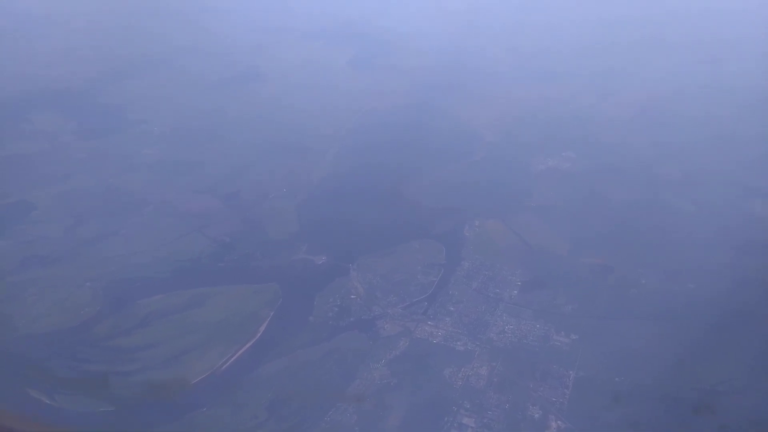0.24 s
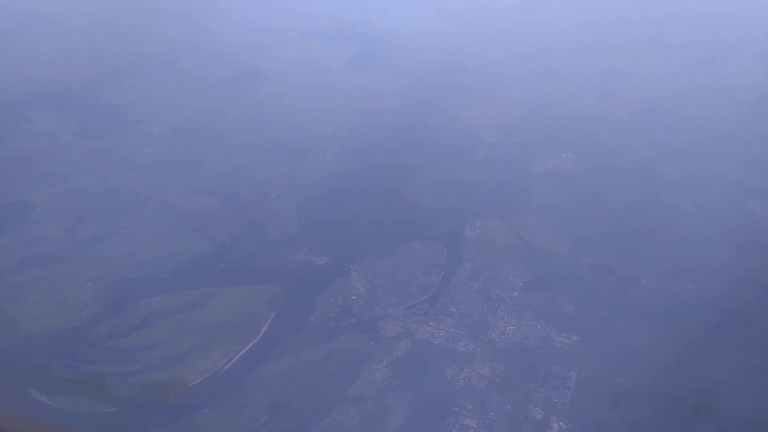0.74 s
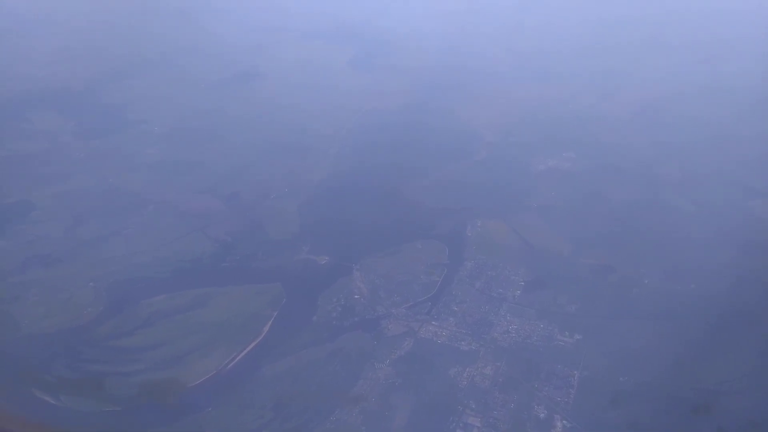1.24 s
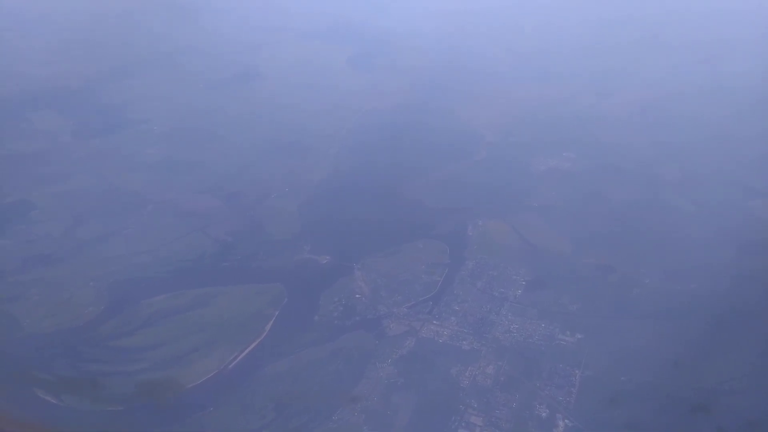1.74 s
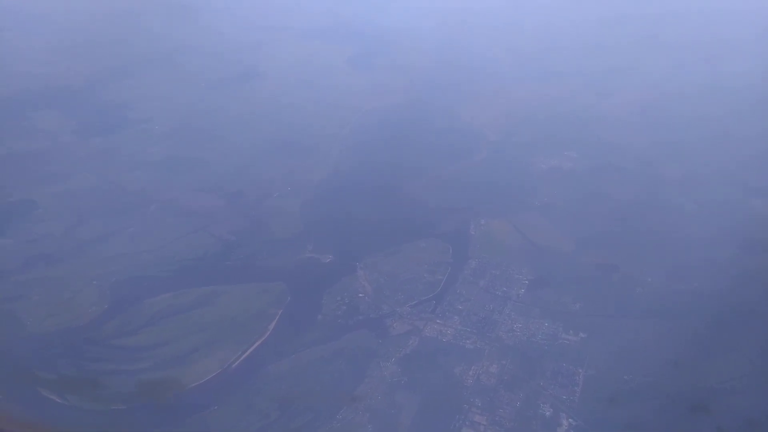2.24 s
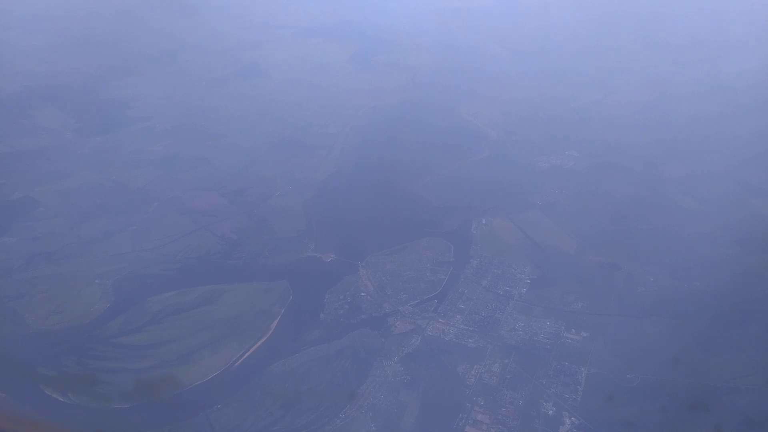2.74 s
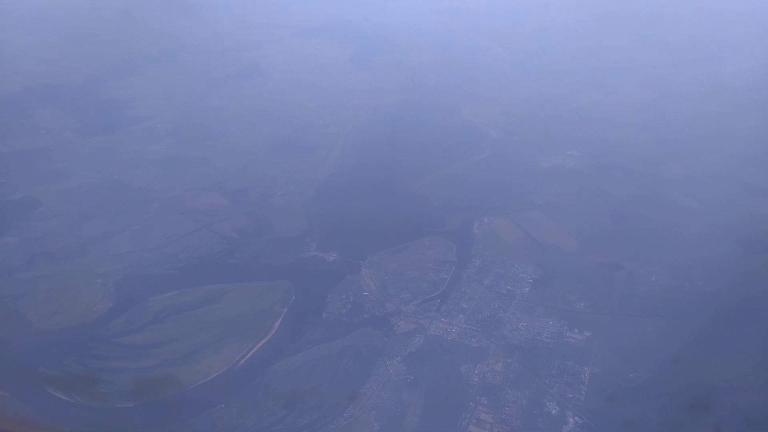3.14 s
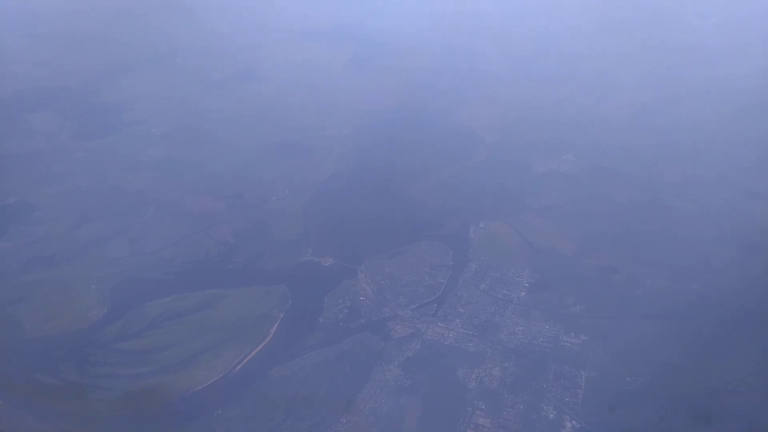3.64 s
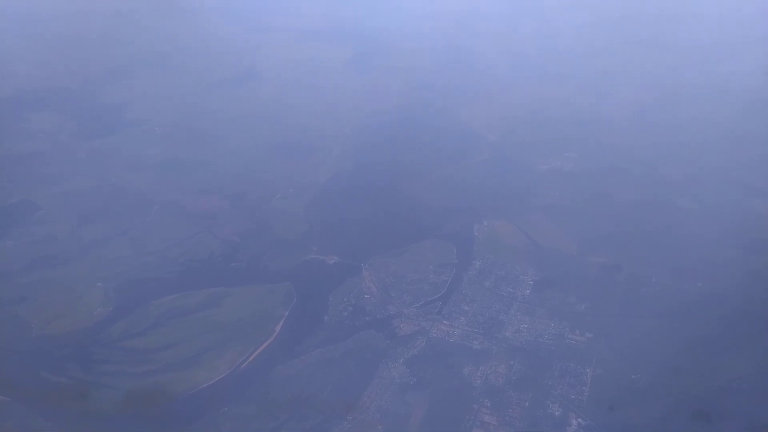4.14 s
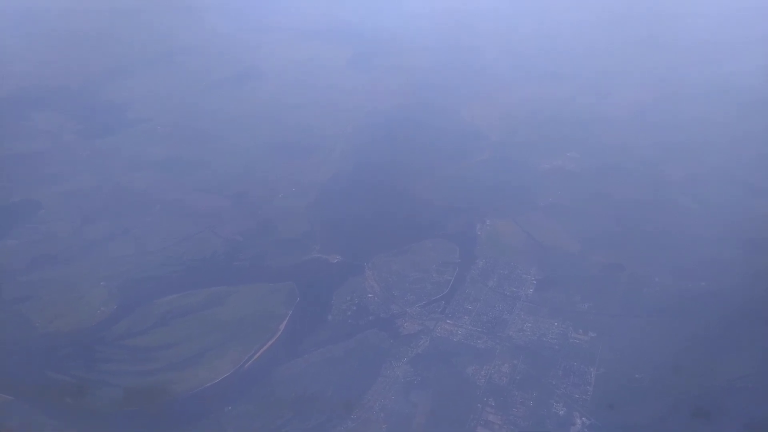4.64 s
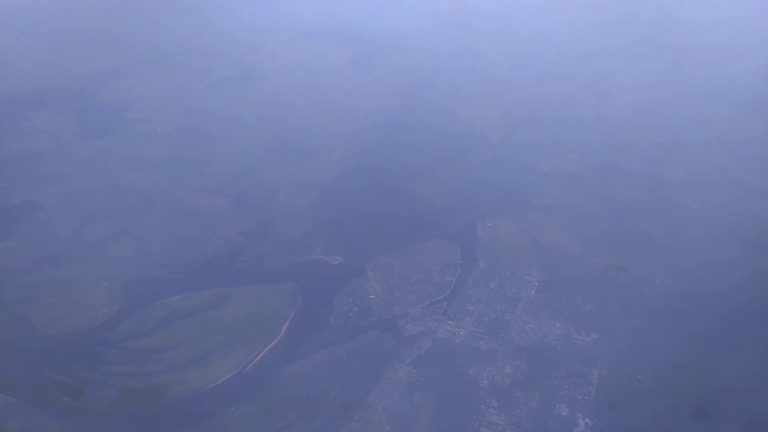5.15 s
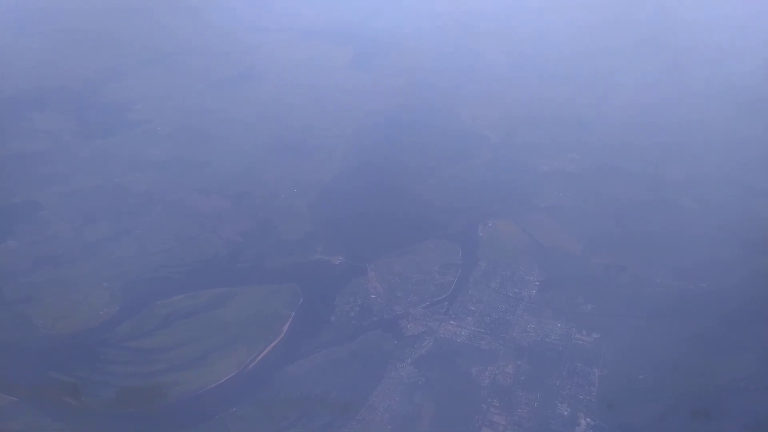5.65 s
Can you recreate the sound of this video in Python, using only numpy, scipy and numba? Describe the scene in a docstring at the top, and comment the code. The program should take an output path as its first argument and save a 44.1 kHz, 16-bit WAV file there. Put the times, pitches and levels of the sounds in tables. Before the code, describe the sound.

Close to the window in a cruising airliner, engine and airflow noise shake the fuselage. A low boom swells and drops out unevenly, with a lumpy mid-range roar from the wall panels and a thin whistling hiss at the window. A loose plastic part ticks and buzzes irregularly throughout, busiest around three and a half seconds, then sparser. Mono microphone, slight hiss of its own.

```python
"""Inside an airliner in cruise, close to the window. Engine exhaust and the air rushing past shake the fuselage:
noise through low resonances makes a boom that swells and drops out, higher ones a roar in the wall panels
and a hiss in the window cavity. A loose plastic part buzzes and ticks: tiny contacts and sharp blows
ring its modes. Faint treble puffs, made of gliding bands of noise, stand over the hiss of the microphone."""
import sys
import numpy as np
from scipy import signal
from scipy.fft import rfft, irfft, next_fast_len
from scipy.io import wavfile
from scipy.ndimage import uniform_filter1d
from numba import njit

SR = 44100
rng = np.random.default_rng(int(sys.argv[2]) if len(sys.argv) > 2 else 0)


def file_out(sig):
    """Save sig as 16-bit WAV at sys.argv[1]."""
    # one column per channel
    cols = np.atleast_2d(sig).T
    # limit, then scale
    lim = np.clip(cols, -1, 1)
    pcm = np.round(lim * 32767).astype(np.int16)
    wavfile.write(sys.argv[1], SR, pcm)


N = 260631  # length in samples


def undb(db):
    """Turn decibels into a plain gain."""
    return 10 ** (np.asarray(db) / 20)


def unit(x):
    """Scale a sound to an RMS (average strength) of 1."""
    return x / np.sqrt(np.mean(x ** 2))


def columns(table):
    """Draw straight lines through each column of a table, one value a sample."""
    time_s, *curves = np.transpose(table)
    return [np.interp(np.arange(N) / SR, time_s, curve) for curve in curves]


@njit
def svf(x, hz, width):
    """State-variable band-pass, gain 1 at a centre that may move every sample."""
    y, band, low = np.empty(len(x)), 0., 0.
    for i in range(len(x)):
        g, damping = np.tan(np.pi * hz[i] / SR), width / hz[i]
        v = (band + g * (x[i] - low)) / (1 + g * (g + damping))
        low += 2 * g * v
        band = 2 * v - band
        y[i] = damping * v
    return y


def ring(force, hz, width):
    """A resonance with steep skirts: three equal band-passes in a row."""
    centre = hz * np.ones(N)
    for _ in range(3):
        force = svf(force, centre, 2 * width)
    return force


def walk(rate):
    """Random levels held 1 / rate seconds and smoothed twice; spread near 1."""
    hold = max(int(SR / rate), 1)
    steps = np.repeat(rng.standard_normal(N // hold + 1), hold)
    return 0.91 * uniform_filter1d(uniform_filter1d(steps, hold), hold)[:N]


def flutter(rate):
    """A quick walk without slow drift, its highs capped at 1.3 while its lows go deeper."""
    w = walk(rate)
    return np.minimum(w - uniform_filter1d(w, int(.3 * SR)), 1.3)


def shaken(modes, flicker_db, rate, drift, gust_db=2.0, patch_db=0):
    """Turbulence drives each mode on its own; strength flickers, alone and together, and the centre wanders."""
    gust = gust_db * flutter(1.3 * rate)  # shared by all modes; a negative gust_db caps the dips instead
    total = np.zeros(N)
    for hz, width, db in modes:
        level_db = db + gust + flicker_db * flutter(rate) + patch_db * walk(2.6)
        centre = hz * (1 + drift * walk(2.947))
        total += undb(level_db) * ring(rng.standard_normal(N), centre, width)
    return unit(total)


# Low drumming of the fuselage: time_s, lower_boom_db, upper_boom_db
BOOM = [(0.03, -25, -26), (0.41, -30, -28), (0.47, -35, -43), (0.53, -36, -22.5), (0.73, -39.5, -27.5),
        (0.8, -25.5, -22), (0.83, -33.5, -26.5), (1.11, -16.5, -30.5), (1.12, -23.5, -22.5),
        (1.24, -30.5, -37), (1.38, -31, -24.5), (1.55, -40.5, -50.5), (1.63, -32, -26.5),
        (1.73, -32, -31.5), (1.97, -19.5, -22.5), (2.0, -22, -24), (2.13, -31.5, -38), (2.17, -23.5, -31),
        (2.33, -35.5, -29), (2.36, -41.5, -46), (2.43, -24.5, -27), (2.46, -32.5, -32),
        (2.66, -19.5, -30.5), (2.79, -40, -31), (2.9, -41.5, -56), (3.0, -35, -24.5), (3.07, -32, -45),
        (3.15, -19, -30), (3.18, -33, -24), (3.26, -29.5, -34), (3.39, -26.5, -30.5), (3.59, -29, -32),
        (3.64, -42, -44), (3.7, -40, -53), (3.78, -27, -32), (3.83, -30, -36), (3.96, -25.5, -25),
        (4.01, -30.5, -24.5), (4.09, -21.5, -34.5), (4.12, -42, -20.5), (4.21, -24.5, -41),
        (4.24, -35, -35.5), (4.31, -20, -24.5), (4.37, -36.5, -43.5), (4.5, -26.5, -20), (4.54, -38, -29),
        (4.57, -20, -25.5), (4.6, -39, -26.5), (4.63, -33, -32), (5.01, -34.5, -32), (5.09, -38.5, -44),
        (5.19, -34, -24), (5.32, -40, -33.5), (5.4, -39, -48), (5.43, -40.5, -26.5), (5.53, -28.5, -31.5),
        (5.58, -41.5, -25), (5.81, -30, -30), (5.86, -46.5, -58), (5.89, -51, -45)]
# Resonances of the shell, each: pitch_hz, width_hz, relative level_db
RUMBLE_MODES = [(36, 24, -17), (52, 39, -12), (78.7, 13, -2.5)]
LOWER_MODES = [(113.5, 44.4, -7.5), (148.8, 26.3, -3.5), (169.9, 46, -8.5)]
UPPER_MODES = [(224.3, 23.9, -1), (252, 17.3, 2), (285.4, 40, -15), (337, 55, -25.5)]
MEAN_BOOM_DB = -31
RUMBLE_DB, RUMBLE_FOLLOWS = -42, 0.2  # level when the lower boom is at its mean; dB per dB of that boom


def fuselage():
    """The shell drums in three groups of low modes; rumble swells with the lower boom, booms throb together."""
    lower_db, upper_db = columns(BOOM)
    rumble_db = RUMBLE_DB + RUMBLE_FOLLOWS * (lower_db - MEAN_BOOM_DB)
    throb_db = 2.2 * flutter(12)
    lower_boom = undb(lower_db + throb_db) * shaken(LOWER_MODES, 3.9, 14, 0.024, gust_db=-0.9)
    upper_boom = undb(upper_db + throb_db) * shaken(UPPER_MODES, 0.89, 9, 0.016, gust_db=-0.5)
    rumble = undb(rumble_db) * shaken(RUMBLE_MODES, 2.2, 15, 0.075)
    return lower_boom + upper_boom + rumble


# Roar of the panels: time_s, floor_db, lower_wall_db, upper_wall_db, overhead_db
PANELS = [(0.0, -44.5, -44, -42.5, -46), (0.13, -33, -42.5, -49.5, -61.5), (0.26, -46.5, -43.5, -44, -52),
          (0.39, -40.5, -45, -41, -67), (0.52, -43, -40.5, -47.5, -53.5), (0.66, -45, -47, -40.5, -48),
          (0.79, -53.5, -39, -55.5, -53), (0.92, -55, -43.5, -45.5, -49.5),
          (1.05, -40.5, -42.5, -48.5, -47.5), (1.18, -56, -46.5, -51.5, -57.5),
          (1.31, -52, -43.5, -42.5, -50), (1.44, -43.5, -40.5, -45.5, -45.5), (1.57, -38, -44, -49, -59),
          (1.7, -45, -39.5, -41, -55), (1.84, -55.5, -51.5, -48, -58.5), (1.97, -43, -46, -44.5, -65.5),
          (2.1, -41.5, -58.5, -43.5, -47.5), (2.23, -51.5, -39.5, -52, -65), (2.36, -52, -51.5, -49, -67),
          (2.49, -57, -32.5, -44.5, -52), (2.62, -72.5, -62.5, -51, -56.5), (2.75, -44.5, -46.5, -49, -60),
          (2.88, -54, -52, -44, -61.5), (3.02, -66, -45, -62, -63), (3.15, -40, -40, -48.5, -61),
          (3.28, -53.5, -45.5, -45.5, -62), (3.41, -37, -41, -43, -53), (3.54, -61, -50.5, -51.5, -63),
          (3.67, -41.5, -41, -45.5, -66), (3.8, -43, -44.5, -49.5, -56), (3.93, -51.5, -44.5, -52.5, -56),
          (4.06, -41, -42.5, -45, -58.5), (4.2, -57.5, -58.5, -45, -60), (4.33, -55.5, -51.5, -46.5, -79),
          (4.46, -48.5, -46.5, -47.5, -52), (4.59, -35, -49, -54.5, -51.5), (4.72, -39, -41, -41.5, -64),
          (4.85, -53, -39.5, -55, -62), (4.98, -43, -43, -52.5, -68), (5.11, -61, -47.5, -40, -55.5),
          (5.24, -51, -52.5, -52.5, -65), (5.38, -38, -47, -47.5, -57), (5.51, -48, -48, -49.5, -55.5),
          (5.64, -38.5, -42.5, -48, -61), (5.77, -54, -41, -63.5, -59), (5.9, -48, -41.5, -54, -66)]
# Resonances of the panels and trim, each: pitch_hz, width_hz, relative level_db
FLOOR_MODES = [(322.8, 43, 1), (398.2, 53, -3.5), (493, 34, -14.5)]
LOWER_WALL_MODES = [(603, 67.5, -2.5), (697.6, 54, -7)]
UPPER_WALL_MODES = [(770.6, 63, 2), (879.3, 49, -5)]
OVERHEAD_MODES = [(950, 120, 1), (1070, 110, -3.5)]
TRIM_MODES = [(1168, 49, 1), (1259, 55, 1.5), (1437, 98, 2), (1594, 100, -2), (1832, 75, -2.5),
              (1966, 78, -6.5), (2113, 53, -6.5)]
TRIM_DB, TRIM_FADE_DB_PER_S = -53, -0.96  # level at the start; the airflow eases off slowly here


def panel_roar():
    """Eddies in the air close to the hull shake the panels, which churn in lumps, and the trim."""
    floor_db, lower_db, upper_db, overhead_db = columns(PANELS)
    trim_db = TRIM_DB + TRIM_FADE_DB_PER_S * np.arange(N) / SR + 0.78 * walk(3.4)
    return (undb(floor_db) * shaken(FLOOR_MODES, 7.5, 24, 0.045, gust_db=7.5)
            + undb(lower_db) * shaken(LOWER_WALL_MODES, 5.7, 26, 0.027, gust_db=0.06)
            + undb(upper_db) * shaken(UPPER_WALL_MODES, 3.6, 20, 0.042, gust_db=2.6)
            + undb(overhead_db) * shaken(OVERHEAD_MODES, 9.0, 20, 0.02, gust_db=3.5)
            + undb(trim_db) * shaken(TRIM_MODES, 5.8, 13, 0.015, gust_db=-1.2))


# Hiss pitched above the window's whistle: time_s, level_db
EDGE = [(0.04, -64), (0.05, -66.5), (0.92, -68.5), (1.19, -71.5), (1.21, -62.5), (1.71, -76.5),
        (1.74, -67.5), (2.13, -66), (2.24, -71.5), (2.73, -65), (2.83, -75.5), (3.56, -67.5), (3.62, -75),
        (4.53, -71.5), (5.24, -76), (5.29, -71), (5.76, -75), (5.86, -78)]
# Resonances of the whistle and of the hiss above it, each: pitch_hz, width_hz, relative level_db
WINDOW_MODES = [(2247, 80, -13), (2320, 90, -4), (2423, 92, 3), (2503, 100, -9.5), (2608, 90, -6.5),
                (2737, 97, -14), (2834, 45, -12)]
EDGE_MODES = [(3023, 44, -2), (3170, 46, -2), (3297, 57, -10.5), (3452, 49, -2.5), (3470, 260, -16)]
WHISTLE_DB = -57


def window_hiss():
    """The same eddies excite the window cavity: a whistle of steady average level, and a hiss above it."""
    whistle = undb(WHISTLE_DB) * shaken(WINDOW_MODES, 3.0, 25, 0.0051, gust_db=1.5)
    edge_db = columns(EDGE)[0] + 1.2 * flutter(9.1)
    return whistle + undb(edge_db) * shaken(EDGE_MODES, 6.5, 12, 0.009, patch_db=4.0)


# Resonances of the loose plastic part: pitch_hz, width_hz, relative level_db
PART_MODES = [(2650, 170, -8.5), (3200, 240, -6), (3310, 230, -11), (3930, 300, -22.5), (4073, 55, -3.5),
              (4272, 120, 5), (4600, 100, -3), (4790, 68, -14.5), (5025, 90, -13), (5160, 100, -17.5),
              (5373, 100, -12), (5840, 70, -20), (5800, 150, -17), (6380, 99, -13), (6700, 160, -17),
              (7200, 160, -28.5), (7580, 160, -24.5), (8070, 210, -22), (8470, 160, -26),
              (9300, 700, -32.5), (11200, 2600, -32.5)]
PART_DRIFT = 0.009  # share by which the modes wander as the part shifts
SEATING_DB, SEATING_PER_S = 4, 7  # each mode gains or loses as the part's seating changes


def struck(force, lo_hz, hi_hz, vary_db, shifts=1):
    """The part's modes between two pitches under a force; each answers differently from moment to moment."""
    total = np.zeros(N)
    for k, (hz, width, db) in enumerate(PART_MODES):
        if lo_hz <= hz < hi_hz:
            level_db = db + vary_db * walk(45) + shifts * SEATING_DB * walk(SEATING_PER_S)
            centre = hz * (1 + shifts * PART_DRIFT * walk(9.1))
            total += (-1) ** k * undb(level_db) * ring(force, centre, width)
    return total


CHATTER_PER_S, CHATTER_SPREAD_DB = 1000, 1.5  # tiny contacts that make the buzz


def chatter(lo_hz, hi_hz):
    """Tiny uneven contacts at random moments ring some of the part's modes."""
    sizes = undb(CHATTER_SPREAD_DB * rng.exponential(size=N)) * rng.standard_normal(N)
    contacts = (rng.random(N) < CHATTER_PER_S / SR) * sizes
    return unit(struck(contacts, lo_hz, hi_hz, 1.9))


# Loose part between ticks: time_s, low_buzz_db, middle_rustle_db, high_rustle_db
BUZZ = [(0.0, -65, -57, -81), (0.12, -74.5, -95, -99), (0.24, -79, -91, -102), (0.36, -69, -79.5, -99),
        (0.48, -78.5, -84, -92.5), (0.6, -72, -83.5, -97), (0.72, -78.5, -78, -86), (0.84, -72, -68.5, -83),
        (0.96, -73, -80, -98), (1.08, -79, -85, -94), (1.2, -75.5, -81, -90), (1.32, -80, -91, -82),
        (1.44, -70, -83, -94), (1.57, -73, -76, -95), (1.69, -77, -81, -93.5), (1.81, -74, -74.5, -88),
        (1.93, -78, -80, -100), (2.05, -73, -81, -89), (2.17, -72, -79.5, -98), (2.29, -75, -85, -97),
        (2.41, -69, -84, -94), (2.53, -70, -80, -84), (2.65, -82, -80.5, -91), (2.77, -67, -72, -94),
        (2.89, -79, -85, -95), (3.01, -85, -90, -99), (3.13, -68, -69, -78), (3.25, -73, -74, -91),
        (3.37, -77, -79, -96.5), (3.49, -74, -80, -86), (3.61, -72.5, -86, -85), (3.73, -72, -85, -99),
        (3.85, -81, -76.5, -98), (3.97, -88, -84.5, -97), (4.09, -72, -80, -89), (4.21, -90, -88, -100),
        (4.33, -69, -82, -85), (4.46, -87, -89, -99), (4.58, -72, -82, -83), (4.7, -79, -92, -102),
        (4.82, -88, -88, -98), (4.94, -71.5, -78, -89), (5.06, -79, -86, -95), (5.18, -74, -79, -92),
        (5.3, -88, -88, -101), (5.42, -70, -80, -92), (5.54, -73.5, -73, -72.5), (5.66, -86, -89, -92),
        (5.78, -85, -83, -90.5), (5.9, -84, -92, -80)]
# Groups of modes in the buzz: from_hz, to_hz
BUZZ_HZ = [(4200, 4450), (4450, 5800), (5800, 7200)]
# The clearest ticks: start_s, low_peak_db, high modes over low_db, sharp crack over low_db
TICKS = [(0.0464, -54.5, -10, -15), (0.069, -58, -11, -20), (0.1733, -64, -17.5, -17),
         (0.216, -59.5, -18, -18), (0.2961, -59, -22, -16), (0.3139, -66.5, -17, -17),
         (0.3468, -53, -23, -23), (0.3556, -59, -18, -22), (0.4457, -53, -12, -18),
         (0.4612, -71, -12, -11.5), (0.552, -57, -15, -18), (0.568, -51, -22, -19), (0.6924, -54, -19, -23),
         (0.7026, -53, -23, -19.5), (0.731, -59, -14.5, -14), (0.791, -55, -7, -8),
         (0.8042, -53.5, -15, -14), (0.823, -61, -8, -12), (0.837, -50, -7, -19), (0.846, -52, -11, -17),
         (0.879, -60, -9, -12), (0.897, -58, -14, -17), (0.9117, -61, -16.5, -15), (0.9354, -60.5, -20, -7),
         (0.998, -55, -3.5, -3.5), (1.0643, -64.5, -16, -12.5), (1.1464, -53.5, -10, -14.5),
         (1.1572, -66, -16, -19), (1.1703, -66, -15, -18), (1.2042, -59, -19, -14), (1.217, -51.5, -12, -9),
         (1.3165, -58, -6, -10), (1.3387, -58, -17, -15), (1.4, -61, -22, -17), (1.409, -49.5, -11, -23),
         (1.422, -67, -16, -18), (1.49, -68, -3, -14), (1.5211, -59, -12, -16), (1.596, -60, -18, -15),
         (1.652, -64, -18, -17), (1.7337, -57.5, -19.5, -17.5), (1.747, -59.5, -16, -14.5),
         (1.802, -55.5, -16, -21), (1.821, -56.5, -16.5, -17.5), (1.9107, -64.5, -15, -19),
         (1.9468, -53.5, -15, -22.5), (1.9668, -51, -6, -19.5), (1.9786, -49.5, -10.5, -25.5),
         (2.02, -59, -5, -19), (2.0733, -57, -19, -20), (2.097, -61.5, -12.5, -18), (2.1208, -61, -20, -18),
         (2.1511, -58, -21, -14.5), (2.1655, -63, -12, -16.5), (2.198, -56.5, -12, -17),
         (2.2953, -60, -15, -21), (2.314, -56.5, -27, -26), (2.377, -55, -14, -13),
         (2.497, -51.5, -11, -12.5), (2.5174, -56, -10, -16), (2.5394, -55, -11, -16),
         (2.561, -57, -13, -13), (2.6537, -58.5, -19.5, -14), (2.7, -61, -6, -10),
         (2.7177, -53.5, -12, -13), (2.7582, -57, -18, -19), (2.7887, -55, -21, -12),
         (3.014, -65, -15, -11), (3.0466, -63, -15, -17), (3.0832, -48.5, -8, -14), (3.1028, -61, -9, -19),
         (3.129, -56, -12, -21), (3.1415, -55, -11, -23), (3.1728, -45, -10, -17), (3.201, -54, -14, -16),
         (3.2898, -55, -16, -10), (3.312, -60, -15, -10), (3.38, -60.5, -9, -7), (3.4177, -49, -11, -17),
         (3.436, -53.5, -8, -14), (3.4595, -66, -11, -15), (3.508, -47.5, -12, -17), (3.5262, -46, -9, -15),
         (3.548, -50, -10, -17), (3.5613, -55, -9, -15), (3.5738, -59, -7, -18), (3.5877, -60, -10, -18),
         (3.7344, -62, -10, -12), (3.7755, -58, -15, -16), (3.782, -61, -20, -18), (3.8378, -60, -7, -8),
         (3.857, -58, -10, -10), (3.8798, -64, -12, -15), (3.9891, -65, 0, -7), (4.0274, -61, -11, -9),
         (4.046, -65.5, -5, -6), (4.113, -58, -12, -16), (4.297, -62, -8, -12.5), (4.314, -62, -5.5, -11),
         (4.3996, -65.5, -22, -11), (4.4998, -57.5, 1, -8), (4.5129, -64, -2, -11), (4.639, -63, -13, -15),
         (4.7804, -64.5, -9, -16), (4.83, -73.5, 5, -6), (4.858, -62, -10, -11), (4.881, -61, -7, -12),
         (4.969, -61.5, -9, -8), (4.9886, -66, -8, -10), (5.089, -57, -6, -15), (5.1193, -58, -5.5, -15),
         (5.129, -62, -7, -16), (5.2852, -61, -10, -6), (5.346, -54, -5, -9), (5.494, -57, -20, -10),
         (5.5076, -62.5, -14, -15), (5.5214, -63, -6, -4), (5.547, -60.5, 3, 0), (5.565, -60.5, -3, -10),
         (5.7238, -65.5, -10, -5)]
# Groups of modes in a tick (low, high, crack): from_hz, to_hz
TICK_HZ = [(2500, 4900), (4900, 7000), (7000, 12500)]
TICK_COLOUR_DB = 3.5  # spread of each mode from tick to tick
BOUNCES, BOUNCE_S, BOUNCE_DB = 3, .007, -9.5  # bounces per tick, within this time, typical size under the tick
SHAKE_DB, SHAKE_T60_S = -12.5, 0.14  # chatter after a tick: level under the tick, time to fall 60 dB


def loose_part():
    """A tick is a sharp blow on the modes with a few bounces, then a short shake; chatter goes on between."""
    out = np.zeros(N)
    for level_db, (lo, hi) in zip(columns(BUZZ), BUZZ_HZ):
        out += undb(level_db) * chatter(lo, hi)

    t = np.arange(N) / SR
    start_s, low_db, high_db, crack_db = np.transpose(TICKS)
    bounce_s = start_s[:, None] + BOUNCE_S * rng.random((len(start_s), BOUNCES))
    bounce_at = (bounce_s * SR).astype(int)
    bounce = undb(BOUNCE_DB) * rng.standard_normal((len(start_s), BOUNCES))
    shake_decay = undb(SHAKE_DB - 60 * t[:SR // 4] / SHAKE_T60_S)
    for tick_db, (lo, hi) in zip((low_db, low_db + high_db, low_db + crack_db), TICK_HZ):
        blows = np.zeros(N)
        blows[(start_s * SR).astype(int)] = undb(tick_db)
        shaking = signal.fftconvolve(blows, shake_decay)[:N]
        blows[bounce_at] += undb(tick_db)[:, None] * bounce
        # peak of a single plain blow, so that the table's levels are peaks
        one_blow = np.max(np.abs(struck(1. * (t == 0), lo, hi, 0, 0)))
        out += struck(blows, lo, hi, TICK_COLOUR_DB, 0.8) / one_blow
        out += shaking * chatter(lo, hi)
    return out


# Faint treble puffs: start_s, length_s, start_hz, end_hz, width_hz, level_db (before the fade in and out)
PUFFS = [(0.74, 0.14, 7600, 7700, 450, -77), (0.93, 0.075, 8200, 7900, 350, -77),
         (1.58, 0.091, 4720, 4600, 200, -73), (2.695, 0.052, 4850, 4770, 300, -67),
         (2.79, 0.07, 5600, 5750, 250, -78), (1.204, 0.061, 8600, 11200, 700, -65.5),
         (1.47, 0.21, 8100, 8500, 250, -78), (1.483, 0.14, 10150, 10500, 1500, -73.5),
         (5.327, 0.087, 9050, 9200, 700, -70.5), (5.46, 0.12, 9200, 9300, 696, -75),
         (5.588, 0.098, 9100, 9400, 900, -72.5), (5.696, 0.14, 9200, 9400, 794, -76.5),
         (5.808, 0.15, 8800, 9100, 900, -75), (5.325, 0.5, 8400, 8550, 250, -81)]


def puffs():
    """Short breaths of air-like hiss: noise in a narrow band that may glide, faded in and out."""
    out = np.zeros(N)
    for start_s, length_s, start_hz, end_hz, width, db in PUFFS:
        i, n = int(start_s * SR), int(length_s * SR)
        glide = np.linspace(start_hz, end_hz, n)
        band = svf(rng.standard_normal(n), glide, 1.5 * width)
        band = svf(band, glide, 1.5 * width)
        puff = undb(db) * unit(band) * np.sqrt(np.hanning(n))
        out[i:i + n] += puff[:N - i]
    return out


def scene():
    """Everything in the cabin, as one channel."""
    return (fuselage() + panel_roar() + window_hiss() + loose_part() + puffs())[None, :]


# Colour of the microphone's hiss: pitch_hz, relative density_db (per Hz)
MIC_HISS = [(3000, -3.5), (4000, -5), (6000, -16.5), (7100, -18.5), (8800, -9), (9400, 0.5), (12000, -1.5),
            (15700, -5.5)]
MIC_HISS_DB, TOP_HZ = -75.5, 15740  # hiss level before the top is cut; where the cut begins


def record(dry):
    """The microphone adds its own hiss, noise shaped by pitch; a steep low-pass cuts the top."""
    size = next_fast_len(N)
    bin_hz = np.arange(size // 2 + 1) * SR / size
    hz, db = np.transpose(MIC_HISS)
    shape = undb(np.interp(np.log(bin_hz + 1), np.log(hz), db))
    noise = irfft(rfft(rng.standard_normal(size)) * shape, size)[:N]
    hiss = undb(MIC_HISS_DB) * unit(noise)
    top_cut = signal.ellip(14, .2, 60, TOP_HZ, fs=SR, output="sos")
    return signal.sosfilt(top_cut, dry + hiss)


dry = scene()
out = record(dry)
file_out(out)
```